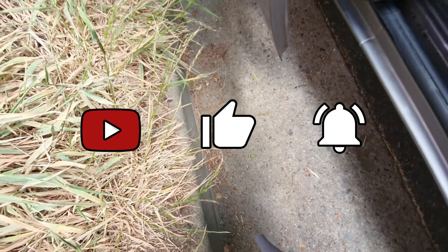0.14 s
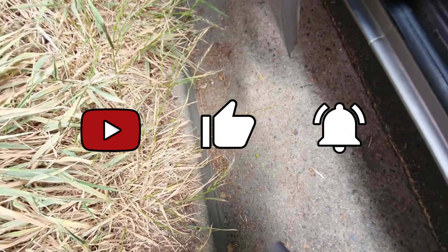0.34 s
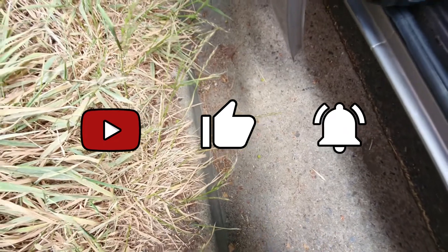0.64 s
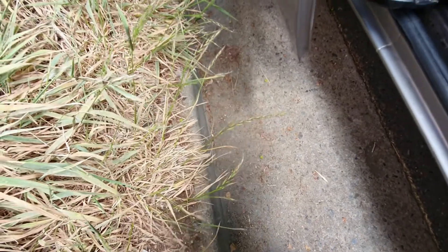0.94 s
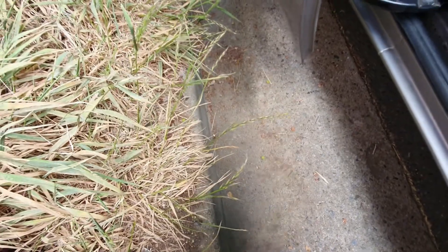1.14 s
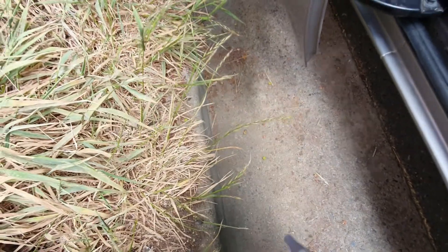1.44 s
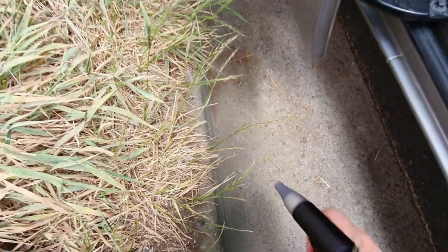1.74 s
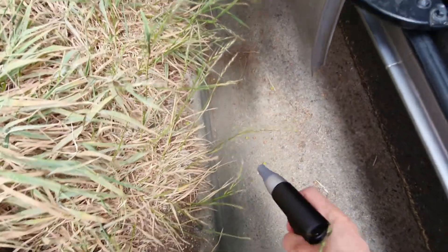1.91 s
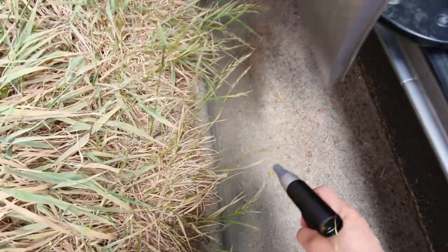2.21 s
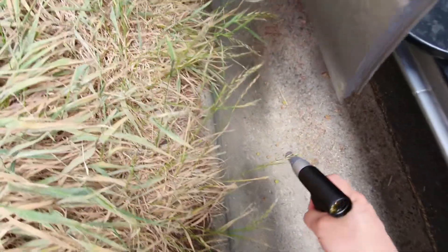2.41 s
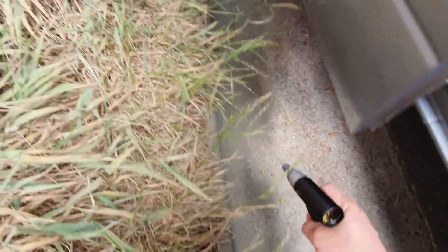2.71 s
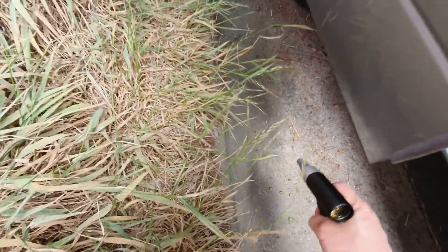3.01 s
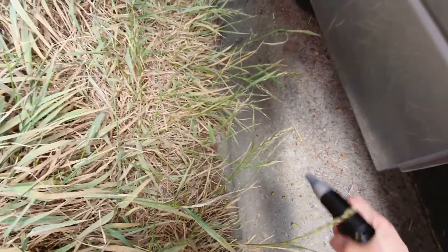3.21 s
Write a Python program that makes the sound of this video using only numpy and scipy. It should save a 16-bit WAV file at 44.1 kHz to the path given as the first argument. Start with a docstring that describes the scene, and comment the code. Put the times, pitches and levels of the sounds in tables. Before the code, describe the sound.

Hand-held blower spins up with a rising whine, then blows a steady, hissing rush of air.

```python
"""A small hand-held battery blower is switched on outdoors and blows over the ground.
Its fan runs up to speed: air rushes through the nozzle, and the spinning shaft and blades add
rising tones that then hold their pitch. Light wind rumbles on the stereo microphone. An insect
buzzes over a quiet outdoor hush and a faint far-off whine until the fan covers them."""
import sys
import numpy as np
from scipy import signal
from scipy.io import wavfile
from scipy.ndimage import uniform_filter1d

SR = 44100
rng = np.random.default_rng(int(sys.argv[2]) if len(sys.argv) > 2 else 0)


def transcribe(u):
    """Save the signal u as a 16-bit wav file named by the first command-line argument.

    u: samples, shape (n,) or (channels, n), limited to [-1, 1]; the rate is SR.
    q: integer samples, one column per channel.
    """
    v = np.clip(np.atleast_2d(u).T, -1, 1)
    q = np.round(v * 32767).astype(np.int16)
    wavfile.write(sys.argv[1], SR, q)


N = 147735
TIMES = np.arange(N) / SR

# Relative strength of the airflow: time_s, level_db, extra_treble_db, extra_bass_db, left_over_right_db
AIRFLOW = [(.35, -73, -8, 2, 0), (.385, -53.5, -10, 9, 0), (.42, -41.5, -15, 0, 1), (.47, -32, -13, -4, -4),
           (.54, -24, -9.5, -4, -1), (.62, -18.5, -8.5, -3, 0), (.72, -16.5, -4.5, -1.5, 0.5),
           (.85, -15, -3, -0.5, 1), (1.05, -13.5, -0.5, -0.5, 1), (1.2, -13.5, -1, -1.5, 1.5),
           (1.5, -14, 1, 0.5, 0), (1.7, -13, -0.5, -1, 0), (1.9, -13.5, -1, 1.5, 0), (2.1, -14, 0, -3, 0),
           (2.3, -13, -1.5, -0.5, -0.5), (2.5, -14, 0, 0.5, 0.5), (2.75, -14, 0, -0.5, 1),
           (3.0, -14.5, 0, -0.5, 0), (3.15, -14, -0.5, -1, 0), (3.35, -16, 2.5, 2.5, -2.5)]
# How late the sound reaches the left side as the hand moves the blower: time_s, lag_microseconds
LEFT_LAG = [(.35, 82), (.53, 150), (.72, 131), (1.28, 145), (1.56, 164), (1.66, 139), (1.83, 101),
            (2.02, 60), (2.11, 81), (2.21, 109), (2.48, 139), (2.74, 127), (2.9, 130), (3.04, 142),
            (3.13, 167), (3.23, 190), (3.35, 212)]


def air_rush():
    """Swirling air hisses through the nozzle, growing louder and brighter as the fan speeds up."""
    # Tone colour of the rush: pitch_hz, left_db, right_db
    air_colour = [(80, -50, -50), (200, -28.7, -26.2), (300, -27.9, -26.1), (440, -27, -23.3),
                  (600, -17.5, -12.6), (800, -14.4, -9.1), (1000, -10.5, -6.9), (1150, -9.1, -4.8),
                  (1350, -14.9, -7.8), (1500, -16.3, -13.4), (1900, -17.7, -15.1), (2150, -15.0, -11.4),
                  (2400, -5.1, -3.7), (2700, -2.6, -0.7), (3100, -5.8, -4.1), (3600, -7.5, -4.8),
                  (4000, -9.5, -6.2), (4500, -8.3, -4.4), (5100, -10.4, -10.4), (5700, -7.6, -4.7),
                  (6350, -11.3, -11.1), (6800, -8.9, -8.8), (7300, -7.1, -6.8), (7900, -8.4, -12.0),
                  (8300, -6.3, -12.4), (9000, -9.0, -8.2), (9450, -13.4, -13.1), (10000, -5.4, -4.5),
                  (10600, -6.3, -1.0), (11400, -9.4, -3.9), (12050, -5.3, 0.0), (12600, -10.4, -7.2),
                  (13500, -9.3, -7.0), (14200, -10.4, -9.5), (15000, -8.8, -9.3), (15650, -8.8, -11.7)]
    # How alike the two sides are: pitch_hz, likeness (0 to 1), extra_right_lead_radians
    stereo_match = [(200, .5, 0), (400, .65, .4), (650, .85, .7), (820, .65, .6), (1100, .85, .9),
                    (1500, .7, .75), (2200, .65, .5), (2800, .82, .3), (3600, .7, .1), (5000, .68, 0),
                    (6300, .5, -.2), (8000, .55, -.7), (10500, .58, .5), (13000, .48, 0), (15500, .45, -.4)]
    # Nozzle and ground resonances that swell or dip as the hand moves:
    # middle_s, half_length_s, pitch_hz, glide_hz_per_s, half_width_hz, left_db, right_db
    resonances = [(0.457, 0.25, 920, -2, 110, 10.5, 10.5), (1.098, 0.43, 890, -58, 90, 6.5, 7),
                  (0.457, 0.066, 2730, 0, 80, 14, 15), (0.557, 0.072, 4500, 0, 110, 9, 9),
                  (1, 0.21, 4480, 0, 110, 2, 8.5), (0.623, 0.16, 5960, 0, 350, 10, 5),
                  (1, 0.084, 8300, 0, 300, 0, 8), (1.197, 0.27, 3120, -2, 100, 2, 8),
                  (1.51, 0.15, 2420, -900, 131, 6.5, 5), (1.505, 0.38, 1320, -100, 80, 1, 3.5),
                  (1.3, 0.36, 1800, -2, 90, -1, 1), (1.4, 0.22, 1640, 0, 80, 3, 1),
                  (1.6, 0.12, 5900, 0, 250, -1.5, -8), (1.685, 0.087, 3440, 0, 99, -4, -12),
                  (1.797, 0.13, 1900, 0, 120, 1, 1), (2.05, .2, 3800, 600, 300, -8, 2.5),
                  (2.096, 0.22, 800, 0, 80, 0, -1), (2.194, 0.088, 534, 1, 80, 12, 9),
                  (2.297, 0.11, 1530, 200, 80, 6, 4), (2.4, 0.2, 3040, -2, 90, 0, 2),
                  (2.452, .2, 7000, -1200, 200, 6.5, 8), (2.55, 0.16, 5450, 797, 295, 5, 4.5),
                  (2.75, .2, 1450, 0, 100, -3, 1.5), (3.073, 0.11, 740, 2, 70, 5, 8.5),
                  (2.964, 0.13, 2574, 2, 44.6, -2, 10), (3.006, 0.17, 5820, 0, 60, 8, 9),
                  (3.15, 0.18, 2230, 0, 120, -3, -9), (.5, 0.16, 11300, 0, 1200, -5, -7),
                  (1.16, 0.034, 12500, 0, 150, 5, 7), (1, 0.36, 1730, 0, 150, 2, 5),
                  (1.5, 0.27, 12500, 0, 150, 2, -1), (2, 0.24, 10600, 0, 250, 2, 3),
                  (2, .25, 12700, 0, 150, 7, 4)]

    def gain(hz, t):
        level, treble, bass, pan = columns(AIRFLOW, t)
        colour = amp(columns(air_colour, hz[:, 0], log=True)[:, :, None])
        # Random patches of louder and softer hiss: left, right and shared.
        patches = rng.standard_normal((len(t), 3, len(hz))).transpose(1, 2, 0)
        patches = uniform_filter1d(patches, size=2, axis=1)
        patches = evened(uniform_filter1d(patches, size=20, axis=2))
        flicker = evened(uniform_filter1d(rng.standard_normal((len(t), len(hz))).T, size=120, axis=0))
        boost_db = treble * np.clip(np.log2(hz / 6000 + 1e-3), 0, 1)
        boost_db += bass * np.clip(np.log2(2000 / (hz + 1)), 0, 1)
        for middle_s, half_s, pitch_hz, glide, width_hz, *sides_db in resonances:
            swell = np.exp(-((t - middle_s) / half_s) ** 2)
            off_pitch = (hz - pitch_hz - glide * (t - middle_s)) / width_hz
            boost_db = boost_db + np.multiply.outer(sides_db, swell / (1 + off_pitch ** 2))
        db = level + boost_db + 2.65 * patches[2] + 1.6 * patches[:2] + 0.89 * flicker
        db += np.array([.5, -.5])[:, None, None] * pan
        return amp(db) * (t > AIRFLOW[0][0]) * evened(colour)

    def lead(hz, t):
        lag_s = columns(LEFT_LAG, t)[0] * 1e-6
        return columns(stereo_match, hz, log=True)[1] + 2 * np.pi * hz * lag_s

    likeness = lambda hz: columns(stereo_match, hz, log=True)[0]
    return stereo_noise(gain, likeness, size=1024, lead=lead) * amp(-26)


def fan_spin():
    """The fan runs up and holds: gives its speed and the count of turns as heard left and right."""
    # Speed of the fan shaft: time_s, turns_per_s
    run_up = [(.36, 480), (.69, 792), (.72, 836), (.745, 867), (.795, 926), (.865, 990.5), (.935, 1050),
              (1.004, 1118), (1.04, 1153), (1.074, 1168), (1.11, 1172.5), (1.2, 1176.3), (1.3, 1176.8),
              (1.5, 1176), (1.75, 1176.8), (1.9, 1176), (2, 1175.7), (2.1, 1175.1), (2.2, 1175.5),
              (2.45, 1174.6), (2.72, 1174.3), (2.82, 1176), (3.1, 1175.5), (3.2, 1174.5), (3.35, 1172)]
    speed = columns(run_up, TIMES)[0]
    right_ahead = np.outer([0, 1e-6], speed * columns(LEFT_LAG, TIMES)[0])
    return speed, np.cumsum(speed) / SR + right_ahead


def shaft_tone(turns):
    """The shaft whines with one wave per turn, wavering as the hand moves."""
    # Loudness of the whine: time_s, left_db, right_db
    loudness = [(.6, -62, -58), (.7, -52, -48), (.8, -44, -38), (.9, -36, -32), (1, -32, -33),
                (1.2, -29, -33), (1.27, -31, -33), (1.38, -29, -33), (1.48, -30, -31), (1.62, -28, -24),
                (1.69, -27, -23), (1.76, -30, -25), (1.83, -28, -23), (1.97, -33, -27), (2.1, -31, -25),
                (2.18, -32, -28), (2.32, -29, -24), (2.46, -30, -25), (2.6, -32, -28), (2.8, -32, -25),
                (2.95, -33, -23), (3.09, -32, -23), (3.16, -33, -26), (3.35, -30, -30)]
    # How far the right side runs ahead, on top of the lag: time_s, lead_radians
    right_lead = [(1, .1), (1.5, .5), (1.8, 1.2), (2.3, 1.5), (3.35, 1.4)]
    fade_in_db = -120 * np.maximum(loudness[0][0] - TIMES, 0)
    db = columns(loudness, TIMES) + fade_in_db + drift(20, count=2)
    phase = 2 * np.pi * turns + np.outer([0, 1], columns(right_lead, TIMES)[0])
    return tone(db, phase)


def blade_tone(turns, blades=13):
    """Each passing blade pushes the air once, making a very high, wavering whistle."""
    # The whistle at each side: time_s, left_db, right_db, right_lead_radians
    whistle = [(.6, -56, -60, -3), (.67, -48, -50, -3), (.7, -39, -31, -1.8), (.765, -42, -37, -1.3),
               (.81, -35, -30, 0), (.86, -41, -33, 0), (.92, -31, -29, .7), (.965, -37, -37, 1.2),
               (1.01, -31, -32, 1.4), (1.06, -34, -33, 2.3), (1.1, -25, -29, 2.8), (1.14, -26, -33, 2.6),
               (1.2, -23, -27, 2.6), (1.26, -30, -26, 1.6), (1.32, -24, -31, .9), (1.38, -19, -28, 1.6),
               (1.44, -21, -36, 1.4), (1.5, -22, -32, 3), (1.56, -27, -28, 3.3), (1.62, -22, -25, 2.8),
               (1.68, -21, -24, .8), (1.74, -23, -30, .4), (1.8, -22, -28, -1.4), (1.88, -28, -35, -3.4),
               (1.93, -26, -39, -6.3), (1.98, -22, -33, -6), (2.04, -25, -33, -5.1), (2.1, -19, -26, -4.3),
               (2.22, -22, -30, -1.5), (2.28, -19, -26, -.5), (2.36, -27, -29, 0), (2.46, -24, -26, 1.8),
               (2.52, -22, -29, 1.1), (2.58, -29, -29, 1.3), (2.64, -21, -25, 1.3), (2.7, -19, -24, 0),
               (2.82, -24, -30, 0), (2.88, -19, -28, 1), (2.94, -21, -30, 2.2), (3.01, -19, -27, .4),
               (3.07, -21, -26, 1.5), (3.12, -24, -29, 3.9), (3.18, -25, -29, 5.9), (3.24, -36, -28, 7.4),
               (3.35, -28, -38, 8.2)]
    *sides_db, lead = columns(whistle, TIMES)
    phase = 2 * np.pi * blades * turns[0] + np.outer([0, 1], lead) + .3 * drift(30, count=2)
    db = np.array(sides_db) + 1.8 * drift(40, count=2)
    return tone(db, phase) * (TIMES > whistle[0][0])


def shaft_overtones(speed, turns):
    """Weaker tones at multiples of the shaft speed ring the casing as they sweep past its resonances."""
    # Overtones and their base levels: multiple, left_db, right_db
    overtones = [(2, -45, -44), (3, -53, -45), (4, -53, -48), (6, -41, -42), (7, -45, -58)]
    # Casing resonances: pitch_hz, half_width_hz, left_boost_db, right_boost_db
    casing = [(1950, 85, 12, 12), (3800, 150, 19, 25), (6810, 90, 13, 15), (7960, 130, 15, 23)]
    airflow_db = 1.5 * (columns(AIRFLOW, TIMES)[0] - AIRFLOW[-1][1])
    out = np.zeros((2, N))
    for multiple, left_db, right_db in overtones:
        ring_db = sum(np.outer(boost_db, np.exp(-((multiple * speed - hz) / width) ** 2))
                      for hz, width, *boost_db in casing)
        db = np.array([[left_db], [right_db]]) + airflow_db + ring_db + 2.5 * drift(20, count=2)
        out += tone(db, 2 * np.pi * multiple * turns + 1.43 * drift(11, count=2))
    return out


def wind(thump_s=.545, thump_half_s=.026, thump_hz=65, thump_db=-28.5):
    """Gusts on the microphone make a low rumble, much alike on both sides, with one short thump."""
    # Tone colour of the rumble: pitch_hz, relative_db
    colour = [(15, -17), (30, -11), (42, -18), (52, -2), (64, 0), (80, -4), (100, -8), (150, -16),
              (210, -30), (300, -40)]
    # Strength of the gusts: time_s, relative_db
    gusts = [(0.0, -48), (0.4, -51), (0.55, -43), (0.7, -45.5), (0.81, -43), (1.08, -53.5), (1.29, -52),
             (1.55, -41.5), (1.77, -48.5), (1.88, -51.5), (1.99, -51.5), (2.28, -45), (2.34, -47),
             (2.62, -48.5), (2.72, -40), (2.86, -46.5), (3.15, -49.5), (3.35, -49)]
    gain = lambda hz, t: amp(columns(colour, hz, log=True)[0]) * (hz < colour[-1][0])
    likeness = lambda hz: np.interp(hz, [90, 250], [.93, .45])
    rumble = evened(stereo_noise(gain, likeness, size=4096))
    rumble *= amp(columns(gusts, TIMES)[0] + 2 + 1.6 * drift(10, count=1))
    t = TIMES - thump_s
    thump = np.exp(-(t / thump_half_s) ** 2) * np.sin(2 * np.pi * thump_hz * t)
    return rumble + np.sqrt(2) * amp(thump_db) * thump


def insect(pitch_hz=6850, width_hz=150):
    """An insect's quickening clicks ring one high resonance until they merge into a buzz."""
    # The first separate clicks: start_s, relative_db
    first_clicks = [(0.0184, -64), (0.0403, -53), (0.0588, -59), (0.0762, -53), (0.0932, -58),
                    (0.1101, -56), (0.1244, -57), (0.1386, -52), (0.1514, -59), (0.1634, -58),
                    (0.1755, -57), (0.187, -57), (0.2074, -57), (0.2598, -55), (0.318, -44)]
    # Loudness of the buzz: time_s, level_db
    buzz_level = [(0, -86), (.15, -78), (.22, -60.5), (.32, -61), (.45, -53), (.7, -58)]
    t = np.arange(600) / SR
    ring = np.exp(-np.pi * width_hz * t) * np.sin(2 * np.pi * pitch_hz * t)
    ring *= 1 - np.exp(-t / 0.0013)  # soft start
    snap = ring + .22 * np.exp(-t / .0006) * np.sin(2 * np.pi * 5600 * t)
    kicks = np.zeros(N)
    for start_s, db in first_clicks:
        kicks[round(start_s * SR)] = amp(db + 7)
    clicks = signal.oaconvolve(kicks, snap)[:N]
    buzz = evened(signal.oaconvolve(rng.standard_normal(N), ring)[:N])
    buzz *= amp(columns(buzz_level, TIMES)[0])
    return (clicks + buzz) * amp([[-.8], [.8]])  # slightly to the right


def outdoor_hush(level_db=-59.5):
    """A quiet, steady wash of noise from all around."""
    # Tone colour of the hush: pitch_hz, relative_db
    colour = [(120, -33), (200, -10), (1360, -22), (1490, -24), (1630, -24), (2230, -24), (5160, -32),
              (6900, -26), (8920, -41), (15700, -31)]
    gain = lambda hz, t: amp(columns(colour, hz, log=True)[0]) * (hz > 200)
    return amp(level_db) * evened(stereo_noise(gain, likeness=lambda hz: 0.043, size=1024))


def far_whine():
    """A brief, faint whine far off, sounding at two and three times a base pitch that falls at the end."""
    # Course of the whine: time_s, base_pitch_hz, level_db
    course = [(0, 747, -86), (.1, 750, -68), (.2, 760, -81), (.26, 740, -67), (.33, 724, -80)]
    hz, db = columns(course, TIMES)
    phase = 2 * np.pi * np.cumsum(hz) / SR
    return amp(db) * (TIMES < course[-1][0]) * (np.cos(2 * phase) + 0.8 * np.cos(3 * phase))


def amp(db):
    """Turns decibels into a volume factor."""
    return 10 ** (np.asarray(db) / 20)


def tone(db, phase):
    """A pure tone with an average (rms) level of db."""
    return np.sqrt(2) * amp(db) * np.cos(phase)


def evened(x):
    """Scales a signal to an average (rms) size of 1."""
    return x / np.sqrt(np.mean(x ** 2) + 1e-20)


def columns(table, at, log=False):
    """Reads a table at the given times or pitches, sliding smoothly between its rows."""
    x, *rest = np.transpose(table)
    if log:
        at, x = np.log(at + 1), np.log(x + 1)
    return np.array([np.interp(at, x, column) for column in rest])


def drift(rate_hz, count):
    """Slow random wobbles of average size 1, mixing waves from a tenth of rate_hz up to rate_hz."""
    t = np.arange(0, N, 64) / SR
    hz = np.geomspace(rate_hz / 10, rate_hz, 24)[:, None]
    starts = rng.random((24, count)).T[:, :, None]
    wobbles = (np.sin(2 * np.pi * (hz * t + starts)) / np.sqrt(hz)).sum(axis=1)
    return np.array([np.interp(TIMES, t, evened(wobble)) for wobble in wobbles])


def stereo_noise(gain, likeness, size, lead=lambda hz, t: 0):
    """Two partly alike noises shaped by gain(hz, t); the right runs ahead by lead(hz, t) radians."""
    hop = size // 4
    hz = np.fft.rfftfreq(size, 1 / SR)[:, None]
    t = np.arange(N // hop + 5) * hop / SR
    a, b, c, d = rng.standard_normal((len(t), len(hz), 4)).T
    left, unrelated = a + 1j * b, c + 1j * d
    alike = np.clip(likeness(hz), 0, 1)
    right = (alike * left + np.sqrt(1 - alike ** 2) * unrelated) * np.exp(1j * lead(hz, t))
    spectra = np.array([left, right]) * gain(hz, t)
    return signal.istft(spectra, nperseg=size, noverlap=size - hop)[1][:, :N]


def scene():
    """The blower and its surroundings, left and right."""
    speed, turns = fan_spin()
    blower = air_rush() + shaft_tone(turns) + blade_tone(turns) + shaft_overtones(speed, turns)
    return blower + wind() + outdoor_hush() + far_whine() + insect()


def record(dry, cutoff_hz=15745):
    """Cuts away the very highest treble."""
    low_pass = signal.firwin(1023, cutoff_hz, window=("kaiser", 9), fs=SR)
    return signal.oaconvolve(dry, low_pass[None], "same")


dry = scene()
out = record(dry)
transcribe(out)
```